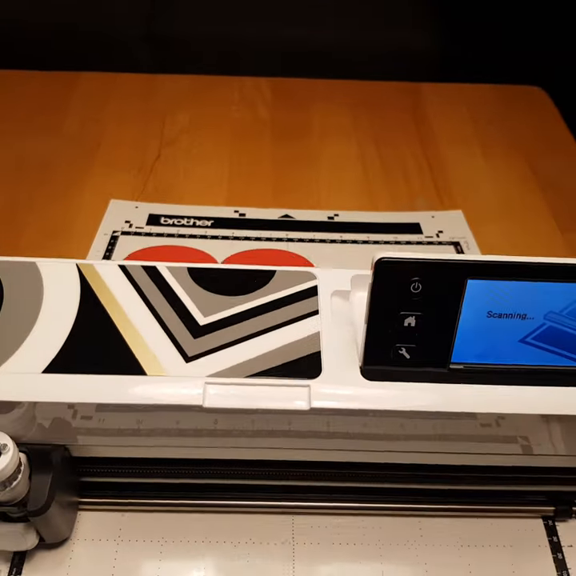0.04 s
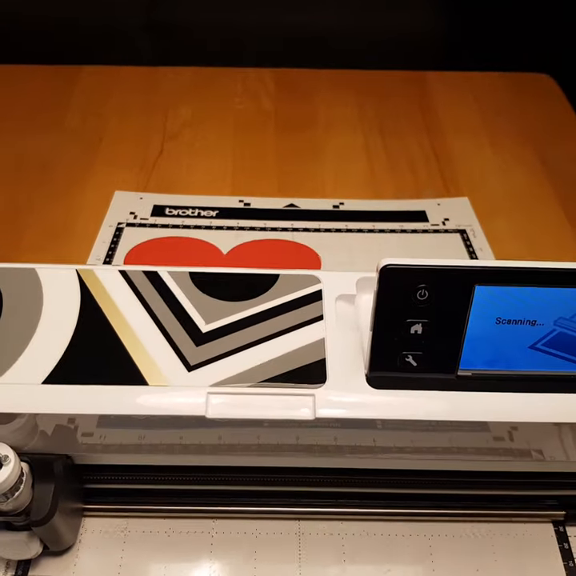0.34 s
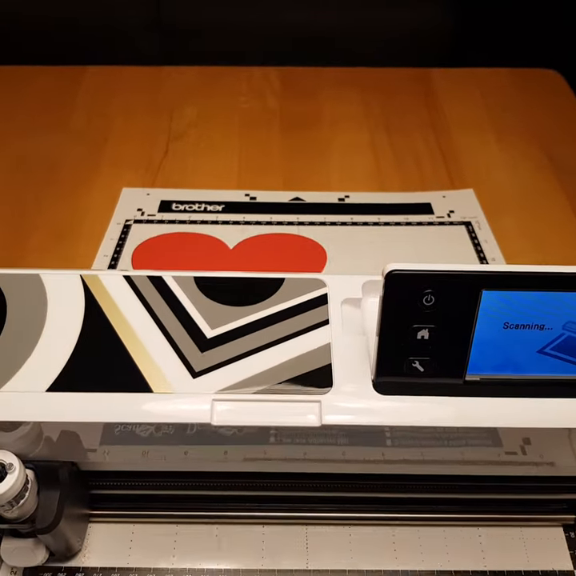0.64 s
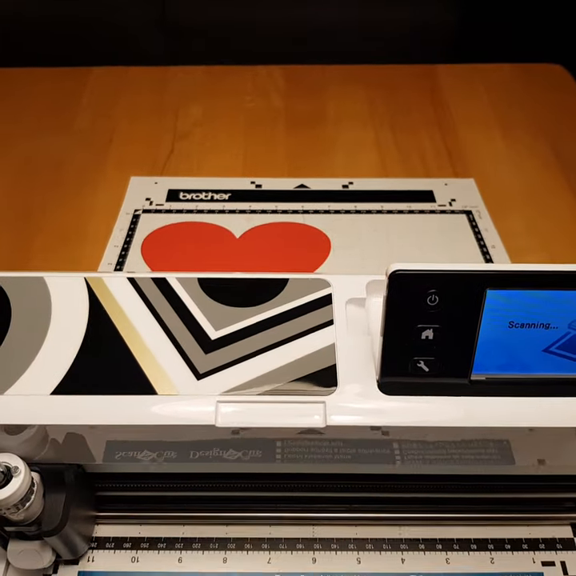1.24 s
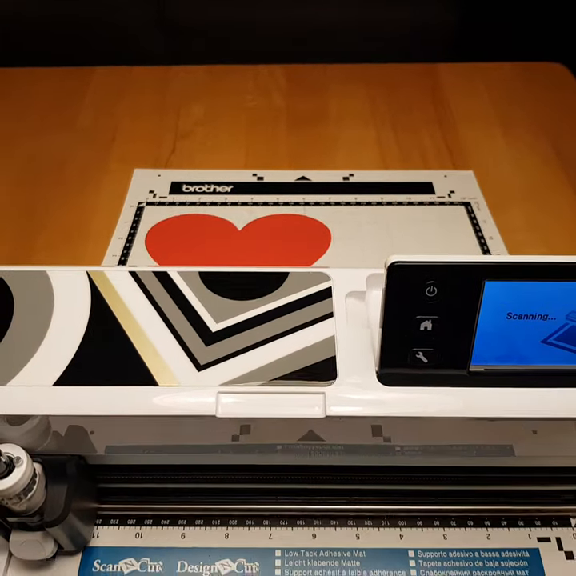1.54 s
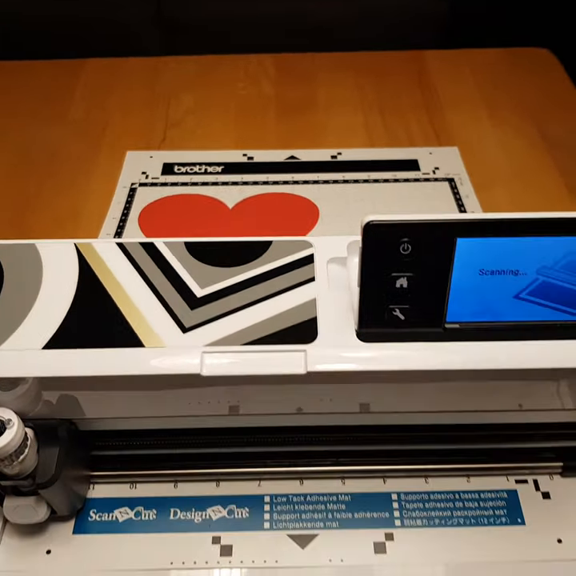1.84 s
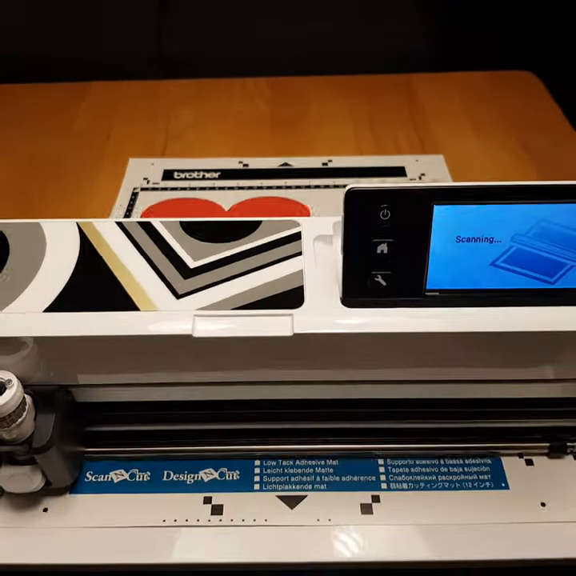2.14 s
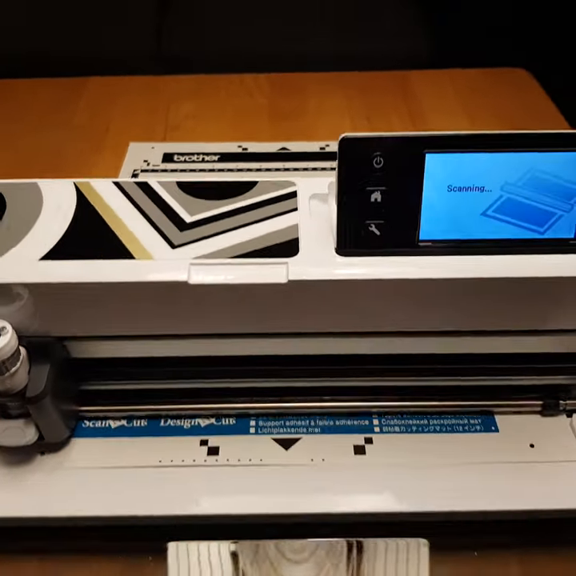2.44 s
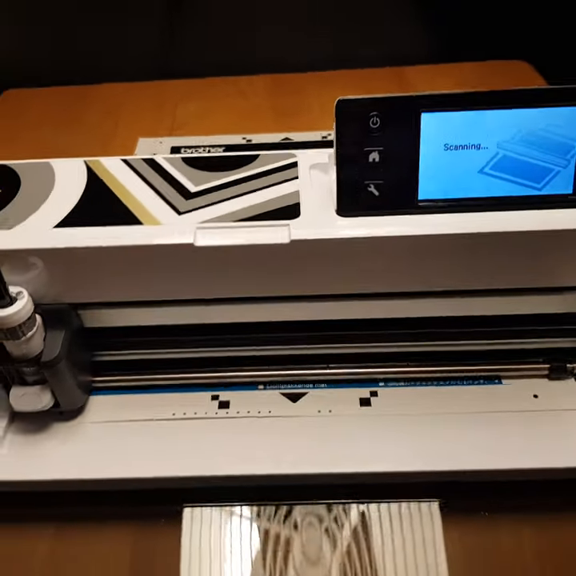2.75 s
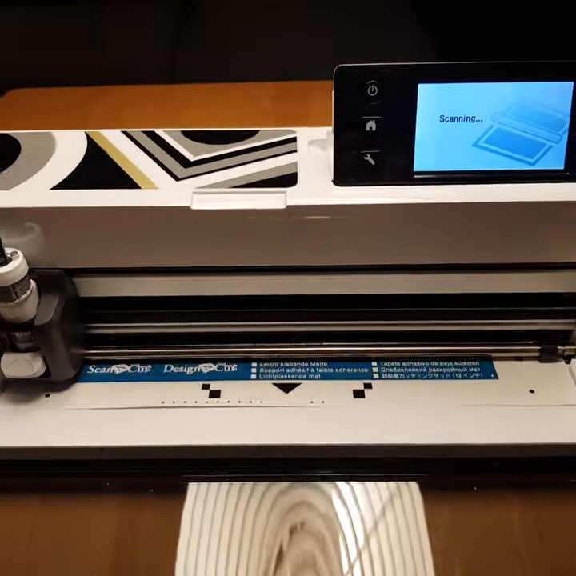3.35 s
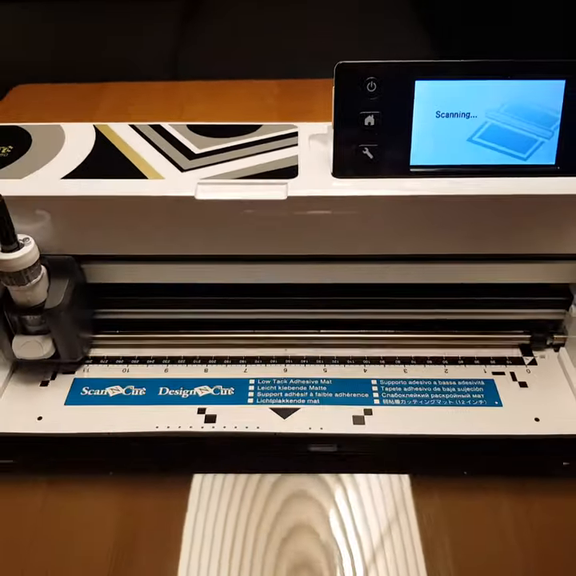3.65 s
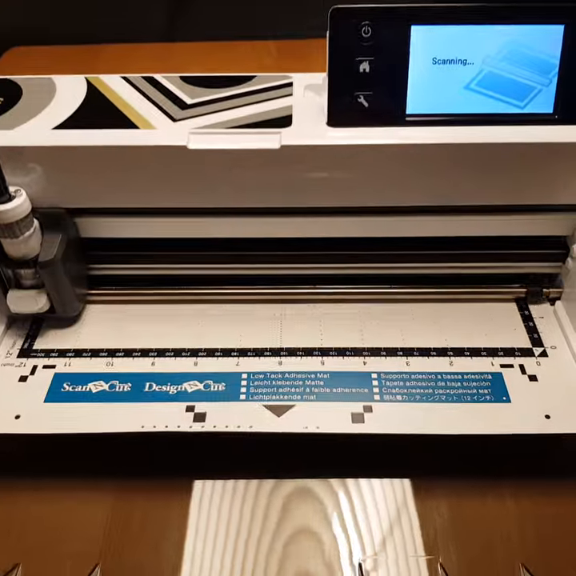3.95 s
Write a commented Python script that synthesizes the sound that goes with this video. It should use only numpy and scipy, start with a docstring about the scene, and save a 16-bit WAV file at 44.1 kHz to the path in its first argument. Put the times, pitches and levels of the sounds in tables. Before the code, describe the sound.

A desktop cutting machine's motor hums close by on one steady note from the start, swelling and fading slightly over a faint gear burr and the soft rub of a mat in the rollers. At about 3.2 seconds the motor halts and the gears give a short clack. The mat immediately runs back faster, with a louder rattling whirr and a hiss, until about 4 seconds.

```python
"""On a wooden table, close by, a desktop cutting machine draws a mat through its rollers.
Its stepper motor (a motor that turns in tiny steps) sings one steady note over a faint gear burr and
the rub of the mat. The tones swell and fade as the microphone drifts through their standing waves,
the loud and quiet spots in the air. The motor halts, the gears take up their slack with a clack,
and the mat runs back faster with a rattling whirr and a hiss."""
import sys
import numpy as np
from scipy import signal
from scipy.fft import rfft, irfft
from scipy.io import wavfile

SR = 44100
rng = np.random.default_rng(int(sys.argv[2]) if len(sys.argv) > 2 else 0)


def put_to_file(sound):
    """Save the sound as 16-bit audio at rate SR, in the file named by the first command-line argument."""
    columns = np.atleast_2d(sound).T  # one column per channel
    safe = np.clip(columns, -1, 1)
    whole_steps = np.round(safe * 32767)
    wavfile.write(sys.argv[1], SR, whole_steps.astype(np.int16))


N = 176400
TIME = np.arange(N) / SR
FREQ = np.maximum(np.arange(N // 2 + 1) * SR / N, 1)
FEED_STEP_HZ, STEPS_PER_GEAR_TURN, GEAR_CATCH_S = 257.38, 24, 0.0213


def from_db(db):
    """Turn decibels (dB) into a number to multiply a sound by."""
    return 10 ** (np.asarray(db) / 20)


def over_time(rows):
    """Join rows that start with a time into smooth curves, one for each other column."""
    times, *columns = np.transpose(rows)
    return [np.interp(TIME, times, column) for column in columns]


def over_hz(rows):
    """Join rows of frequency and value into one curve from bass to treble."""
    hz, value = np.transpose(rows)
    return np.interp(np.log(FREQ), np.log(hz), value)


def drift(hz):
    """A random wobble, about 1 in size; a higher hz makes it quicker."""
    memory = np.exp(-200 * np.pi * hz / SR)
    slow = signal.lfilter([1], [1, -2 * memory, memory ** 2], rng.standard_normal(N // 100 + 1002))[1000:]
    slow /= np.sqrt(np.mean(slow ** 2))
    return np.interp(np.arange(N) / 100, np.arange(len(slow)), slow)


def noise(spectrum):
    """Stereo noise shaped by rows of frequency and level, alike on both sides only in the bass."""
    # Each row: frequency in Hz, how alike left and right are (1 is the same).
    likeness = [(30, 0.48), (130, 1), (400, 1), (1000, 0.38), (2000, 0.037), (6000, 0.02)]
    alike = over_hz(likeness)
    middle, side = rfft(rng.standard_normal((2, N)))
    pair = np.sqrt(1 + alike) * middle + np.sqrt(1 - alike) * side * [[1], [-1]]
    return irfft(pair * from_db(over_hz(spectrum)), N) * np.sqrt(SR) / 2


def tone(cycles, waver_db, waver_hz, apart):
    """A wavering pure tone; reflections set left and right apart in level and timing."""
    side = apart * np.array([[1], [-1]])
    gain = from_db(waver_db * drift(waver_hz)) * (1 + side * drift(0.85) / 2)
    return np.sqrt(2) * gain * np.sin(2 * np.pi * (cycles + rng.random()) + side * drift(1.0))


def motor_note(steps):
    """Even steps make harmonics, tones at multiples of the step rate: three strong, many thin."""
    # Harmonics 2, 4 and 6 at the moving microphone.
    # Each row: time in seconds, left and right level in dB, the left wave's lead in radians.
    second = [(0.03, -35, -43, 0.9), (0.27, -37.5, -45, 1.04), (0.72, -34, -39.5, 0.2),
              (1.05, -43, -49, 1.5), (1.2, -34, -37.5, 0.5), (1.41, -36.5, -45, 1), (1.47, -39, -53, 2),
              (1.53, -41, -43.5, 1.5), (1.65, -36.5, -41, 0.93), (1.89, -38, -48.5, 2.1),
              (1.98, -36, -48, 1.2), (2.13, -32, -39.5, 0.4), (2.28, -40.5, -43.5, -2.6),
              (2.37, -35, -49, -5), (2.61, -34.5, -67.5, -2.3), (2.73, -29.5, -38.5, -1.4),
              (3.15, -30.5, -47, 2)]
    fourth = [(0.03, -30, -41, -0.012), (0.36, -29.5, -36, -1.7), (0.63, -30, -36.5, -1.53),
              (0.93, -33, -41.5, 0.3), (1.17, -33, -39.5, 0.19), (1.29, -32, -41.5, 0.9),
              (1.38, -32, -41, -1.1), (1.68, -35, -45, -2.1), (1.74, -33, -49, -1.2),
              (1.89, -32.5, -39.5, -0.1), (2.16, -31.5, -37, 0.62), (2.46, -28.5, -34.5, 0.86),
              (2.73, -28.5, -35.5, 0.91), (2.85, -27, -30.5, 0.015), (3.15, -28.5, -30.5, 0.2)]
    sixth = [(0.03, -61, -53.5, -0.5), (0.21, -51, -50.5, 2), (1.02, -62.5, -60, -3.5),
             (1.3, -60, -55.5, -1), (1.47, -62, -56.5, -1.5), (1.77, -58, -57, -1.5),
             (2.46, -59, -74, -6.5), (2.61, -53.5, -50.5, -6), (3.15, -57, -53, -5)]
    # Thin tones that swell as the microphone moves, by multiple. Each row: time in seconds, level in dB.
    whistles = {1: [(0, -59.5), (.65, -56), (.85, -63.5), (1.8, -58.5), (2.1, -53.5), (2.6, -60.5)],
                8: [(0, -65.5), (1.0, -60.5), (2.7, -65), (2.92, -55)], 12: [(0, -72.5), (.3, -76.5),
                (.7, -78), (.8, -67), (1.2, -64.5), (1.9, -73), (2.15, -65.5), (2.4, -68), (2.95, -65),
                (3.05, -63.5)], 20: [(0, -74), (1.3, -75.5), (2.4, -67), (3.15, -75.5)], 24: [(0, -85.5),
                (1.8, -75), (2.5, -66.5), (3.15, -72)], 28: [(0, -80.5), (1.6, -82), (1.9, -75),
                (2.35, -80)], 32: [(0, -81.5), (1.85, -88), (2.1, -72.5), (2.65, -80), (3.15, -83.5)],
                36: [(0, -71), (.7, -79), (1.05, -82.5), (1.35, -76), (1.85, -84), (2.35, -78.5),
                (2.8, -88)]}
    # Weak tones. Each row: multiple of the step rate, level in dB.
    weak_tones = [(5, -58), (9, -71.5), (10, -74), (14, -77.5), (16, -79), (19, -79.5), (22, -79.5),
                  (40, -82.5)]
    strong_boost_db, weak_cut_db = 0.86, 3
    out = np.zeros((2, N))
    for multiple, rows, shake_db in [(2, second, .5), (4, fourth, .15), (6, sixth, .8)]:
        left_db, right_db, lead = over_time(rows)
        phase = 2 * np.pi * (multiple * steps + rng.random())
        gain = from_db(np.array([left_db, right_db]) + strong_boost_db + shake_db * drift(25))
        out += np.sqrt(2) * gain * np.sin([phase, phase - lead])
    for multiple, rows in whistles.items():
        left_lead = np.array([[min(multiple / 40, .25)], [0]])
        whistle = tone(multiple * steps + left_lead, waver_db=1.03, waver_hz=9.8, apart=0.17)
        out += from_db(over_time(rows)[0]) * whistle
    for multiple, db in weak_tones:
        out += from_db(db - weak_cut_db) * tone(multiple * steps, waver_db=3.5, waver_hz=2.5, apart=0.19)
    return out


def gear_burr(steps):
    """A slightly off-centre gear presses tighter once a turn, so the gear tones flutter."""
    # Each row: pitch in Hz, level in dB.
    gear_tones = [(150.7, -73.5), (375.5, -57), (440.1, -57), (589.5, -63), (729.5, -60.5), (878.8, -58.5),
                  (954.2, -61.5), (1104.9, -63)]
    cut_db, flutter_db = .5, 3.5
    burr = np.zeros((2, N))
    for hz, db in gear_tones:
        cycles = hz * steps / FEED_STEP_HZ
        burr += from_db(db - cut_db) * tone(cycles, waver_db=3.2, waver_hz=1.8, apart=0.15)
    tightness = .5 * np.cos(2 * np.pi * (TIME - GEAR_CATCH_S) * FEED_STEP_HZ / STEPS_PER_GEAR_TURN)
    return from_db(flutter_db * tightness) * burr


def gear_teeth():
    """Once a turn one tooth catches hard and the next ones ever more softly; each rings briefly."""
    # What a tooth sets ringing. Each row: pitch in Hz, level in dB.
    rings = [(375.3, -51.5), (739.9, -49), (815.1, -44.5), (889.6, -47.5)]
    teeth, rise_s, softer_db = 7, .0013, 2.2
    tooth_hz = FEED_STEP_HZ * teeth / STEPS_PER_GEAR_TURN
    tooth, fraction = np.divmod((TIME - GEAR_CATCH_S) * tooth_hz, 1)
    age = fraction / tooth_hz / rise_s
    ticks = age * np.exp(1 - age) * from_db(-softer_db * (tooth % teeth))
    ring = sum(from_db(db) * tone(hz * TIME, waver_db=2.0, waver_hz=2.7, apart=0.24) for hz, db in rings)
    return ticks * ring


def feed_friction():
    """The rollers rumble, the teeth tick, and the mat rubs in tiny jerks at twice the step rate."""
    # Each row: time in seconds, change in dB for rumble and ticks, change in dB for hiss.
    levels = [(0, 1, -4.5), (.8, -.5, -7.5), (1.25, 0, -3.5), (1.65, -1, 0), (2.0, 1.5, 0.5), (2.2, 3, 2.5),
              (2.6, 3, 3.5), (2.9, 4, 2.5), (3.17, 0.5, 0.5)]
    # Roller rumble and mat hiss. Each row: frequency in Hz, level in dB per Hz.
    rumble_colour = [(25, -110), (70, -100), (170, -95.5), (260, -83.5), (400, -83.5), (520, -73),
                     (620, -83), (1100, -78.5), (1400, -87), (2300, -91.5), (3200, -108), (8000, -125)]
    hiss_colour = [(1000, -110), (2200, -97.5), (3700, -97), (4400, -103), (5200, -101), (7000, -104),
                   (7900, -111), (11300, -111), (12000, -116), (16000, -118)]
    rumble_db, hiss_db = over_time(levels)
    rumble = from_db(rumble_db) * (noise(rumble_colour) + gear_teeth())
    jerks = 1 + 0.24 * np.sin(2 * np.pi * 2 * FEED_STEP_HZ * TIME)
    return rumble + from_db(hiss_db + drift(21)) * jerks * noise(hiss_colour)


def gear_clack():
    """The gears take up their slack: each knock is a dull thump, a ring of the case and a click."""
    # Each row: start in seconds, thump level in dB, thump pitch in Hz, click level in dB.
    knocks = [(2.905, -42, 260, -78), (3.182, -22.5, 816, -71), (3.188, -20.5, 413, -52),
              (3.2165, -25.5, 841, -29.5), (3.221, -20, 429, -44.5), (3.232, -25, 798, -55),
              (3.243, -33, 149, -60), (3.256, -32, 810, -59)]
    # The plastic case's notes. Each row: pitch in Hz, level in dB, seconds to fade by 60 dB.
    case_notes = [(137, -22, 0.15), (248, -17.5, .15), (360, -19.5, 0.084), (724, -6, 0.074),
                  (1023, -9, 0.077)]
    # The click's noise. Each row: frequency in Hz, relative level in dB.
    click_colour = [(500, 9.5), (1200, -3), (1620, 9), (1950, 1), (2300, 4.5), (2900, -8.5), (3700, 2),
                    (4500, -7), (5600, 2), (7300, -7.5), (9000, -16.5), (16000, -29)]
    thump_s, spread_octaves, roughness, bass_cut_hz = .0035, 0.76, 0.3, 117
    click_rise_s, click_fade_s, snap_hz, snap_db = 0.00058, 0.047, 1613, -1.5
    body, clicks = np.zeros(N), np.zeros(N)
    for start_s, thump_db, pitch_hz, click_db in knocks:
        age = np.maximum(TIME - start_s, 0)
        knock = (age / thump_s * np.exp(1 - age / thump_s)) ** 2 * np.sin(2 * np.pi * pitch_hz * age)
        contact = 1 - np.exp(-(age / thump_s) ** 2)
        for hz, db, fade_s in case_notes:
            # A knock stirs the notes near its own pitch most.
            nearness = np.exp(-.5 * (np.log2(hz / pitch_hz) / spread_octaves) ** 2)
            fade = from_db(db - 60 * np.minimum(age / fade_s, 2))
            knock += contact * nearness * fade * np.sin(2 * np.pi * hz * age)
        body += from_db(thump_db) * knock * (1 + roughness * drift(250))
        click_fade = from_db(click_db - 60 * np.minimum(age / click_fade_s, 2))
        clicks += (1 - np.exp(-age / click_rise_s)) * click_fade
    crackle = noise(click_colour)
    snap = from_db(snap_db) * np.sin(2 * np.pi * snap_hz * TIME)
    bass_cut = signal.butter(2, bass_cut_hz, "high", fs=SR, output="sos")
    return signal.sosfilt(bass_cut, body + clicks * (crackle / crackle.std() + snap))


def room(sound):
    """The room adds a short dull echo with little bass, different on each side."""
    fade_s, echo_db = 0.26, -6.5
    age = TIME[:SR // 2]
    band = signal.butter(2, [250, 5000], "band", fs=SR)
    tail = signal.lfilter(*band, rng.standard_normal((2, len(age)))) * from_db(-60 * age / fade_s)
    echo = signal.fftconvolve(sound, tail / np.linalg.norm(tail[0]), axes=1)[:, :N]
    return sound + from_db(echo_db) * echo


def fast_return():
    """Motor and gear tones follow one small gear and clash into a rattle over rumble and hiss."""
    # Each row: time in seconds, motor steps per second.
    speed = [(3.22, 268), (3.27, 276.7), (3.32, 278.9), (3.63, 278.8), (3.78, 275.7), (3.97, 275.8),
             (4.0, 271)]
    # Each tone's pitch, as a multiple of the small gear's turning rate.
    multiples = (5.13, 7, 10, 11, 14, 20, 21, 24, 26, 28, 35)
    # Each row: one tone's level in dB at each of the four times below.
    tone_levels = [(-54.5, -51.5, -62, -63), (-45, -48.5, -47, -46.5), (-53, -45.5, -46.5, -45),
                   (-42, -55, -52, -53), (-41.5, -40.5, -35.5, -37), (-53, -51.5, -41.5, -49),
                   (-35.5, -35, -34, -32.5), (-62, -40.5, -41, -40), (-58, -55, -48, -53),
                   (-46, -46.5, -46.5, -43.5), (-53.5, -48.5, -73, -49)]
    times_s = (3.27, 3.5, 3.75, 4.0)
    # Each row: time in seconds, change in dB for rumble, change in dB for hiss.
    friction_levels = [(3.22, 2, 4.5), (3.3, -2.5, 2), (3.36, -3, 2), (3.55, -4, 1.5), (3.68, -4.5, 3),
                       (3.8, -4, -1), (3.9, -5, -1), (4.0, -3.5, -7)]
    # Roller rumble. Each row: frequency in Hz, level in dB per Hz.
    rumble_colour = [(50, -106), (90, -81.5), (200, -76.5), (340, -74), (420, -65.5), (620, -71),
                     (850, -62), (1150, -70.5), (1400, -76.5), (2300, -81.5), (4000, -100)]
    steps_per_turn, rattle_db, left_right_db = 7, 1.5, [[-1.3], [.3]]
    turns = np.cumsum(over_time(speed)[0]) / SR / steps_per_turn + 0.00063 * drift(20)
    whirr = np.zeros((2, N))
    for multiple, levels_db in zip(multiples, tone_levels):
        gain = from_db(np.interp(TIME, times_s, levels_db))
        whirr += gain * tone(multiple * turns, waver_db=2.0, waver_hz=14.6, apart=0.23)
    whirr *= from_db(rattle_db * drift(104)) * from_db(left_right_db)
    rumble_db, hiss_db = over_time(friction_levels)
    chatter = 1 + 0.13 * np.sin(2 * np.pi * 3 * turns)
    rumble = from_db(rumble_db) * chatter * noise(rumble_colour)
    return whirr + rumble + from_db(hiss_db + 0.5 * drift(60)) * mat_scrape()


def mat_scrape():
    """The mat hisses over its guides, with a few ringing notes that swell, rasp and fade."""
    # Each row: frequency in Hz, level in dB per Hz.
    hiss_colour = [(1200, -100), (2600, -87), (3700, -85), (4500, -90.5), (5400, -89), (6000, -93),
                   (7100, -90.5), (8000, -99), (10800, -96), (16000, -110)]
    # Each row: pitch in Hz, width in Hz, level in dB, loudest moment and its spread in seconds.
    rings = [(1633, 29, -58.5, 3.8, .6), (2236, 31, -59.5, 3.6, 0.56), (3950, 260, -54.5, 3.52, 0.29),
             (5400, 70, -59, 3.97, .035)]
    rasp_db = 2.5
    out = noise(hiss_colour)
    for hz, width_hz, db, peak_s, spread_s in rings:
        rubbing = from_db(rasp_db * drift(90)) * rng.standard_normal((2, N))
        ring = signal.lfilter(*signal.iirpeak(hz, hz / width_hz, fs=SR), rubbing)
        swell = np.exp(-.5 * ((TIME - peak_s) / spread_s) ** 2)
        out += from_db(db) * swell * ring / ring.std()
    return out


def scene():
    """The mat feeds in slowly, the drive halts with a clack, and the mat runs back fast."""
    stop_s, stop_fade_s, return_s, return_rise_s = 3.178, 0.014, 3.222, 0.082
    feeding = np.clip(1 - (TIME - stop_s) / stop_fade_s, 0, 1)
    returning = np.clip((TIME - return_s) / return_rise_s, 0, 1)
    steps = FEED_STEP_HZ * TIME + 0.00098 * drift(22) + 0.015 * drift(0.78)
    feed = feeding * (motor_note(steps) + gear_burr(steps)) + (1 - returning) * feed_friction()
    return feed + room(gear_clack()) + np.sqrt(returning) * fast_return()


def record(dry):
    """The very highest treble is cut off steeply."""
    cutoff_hz = 15800
    return signal.sosfilt(signal.ellip(12, .1, 80, cutoff_hz, fs=SR, output="sos"), dry)


dry = scene()
out = record(dry)
put_to_file(out)
```